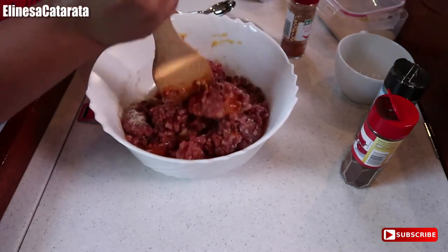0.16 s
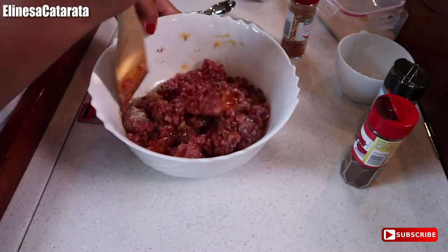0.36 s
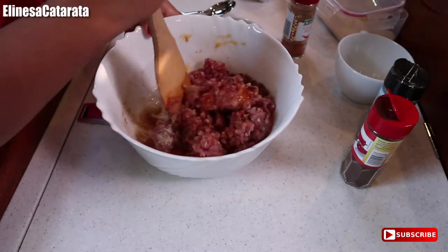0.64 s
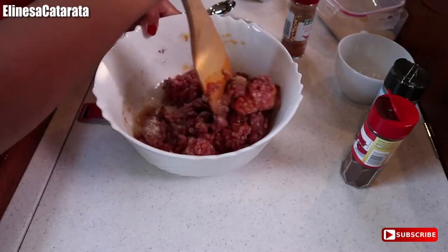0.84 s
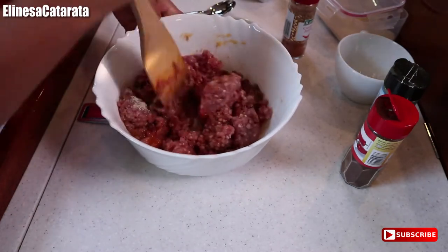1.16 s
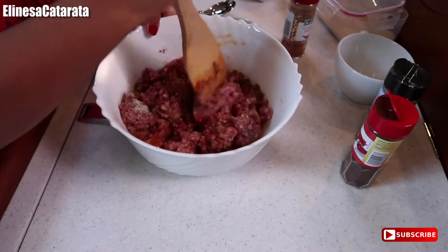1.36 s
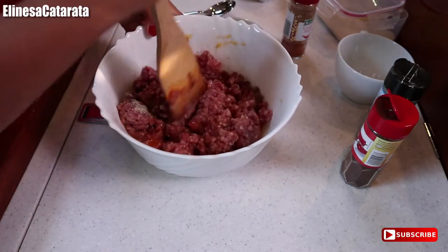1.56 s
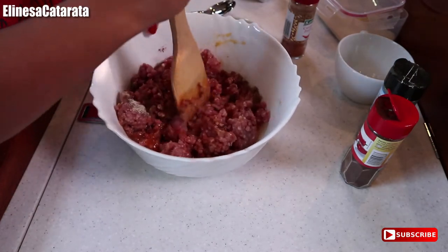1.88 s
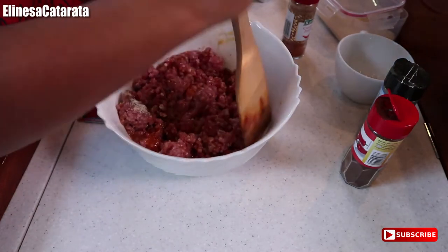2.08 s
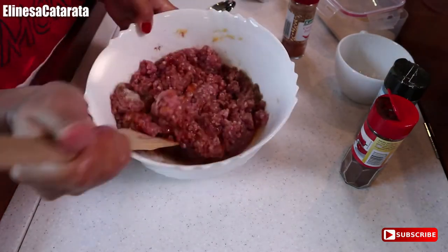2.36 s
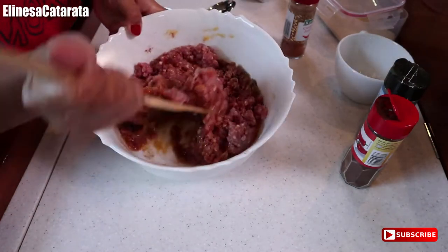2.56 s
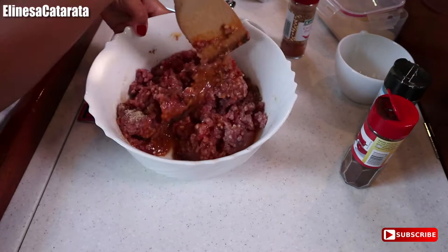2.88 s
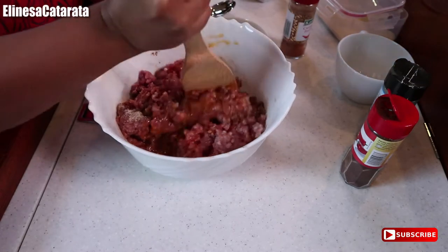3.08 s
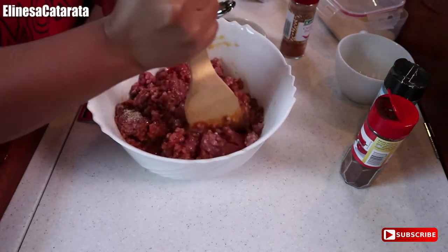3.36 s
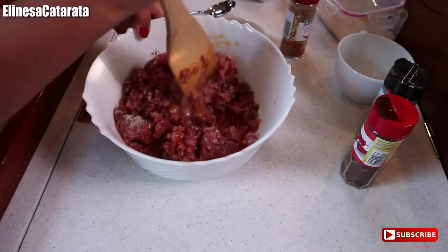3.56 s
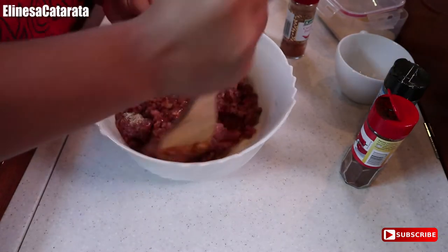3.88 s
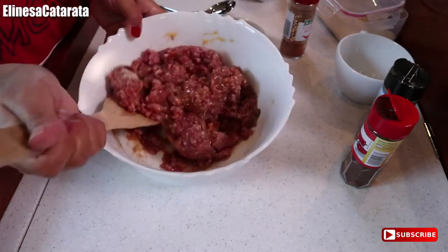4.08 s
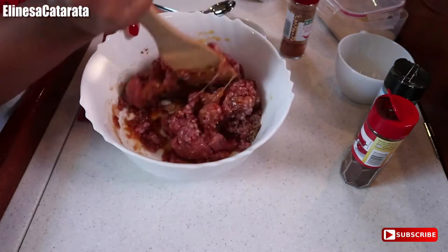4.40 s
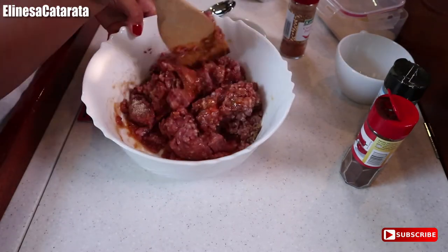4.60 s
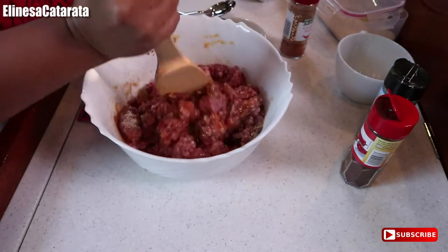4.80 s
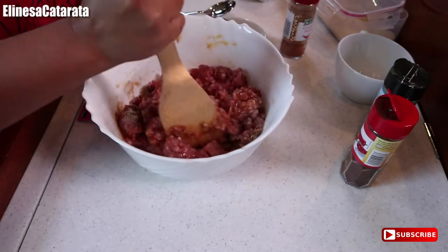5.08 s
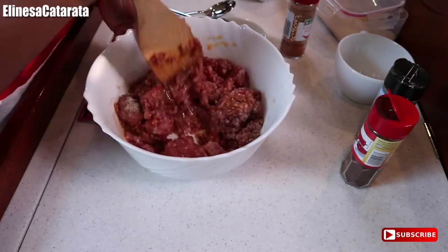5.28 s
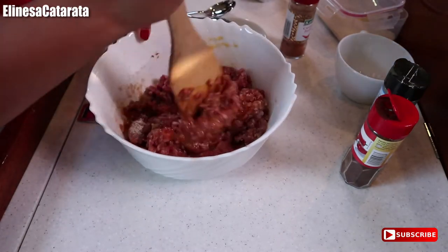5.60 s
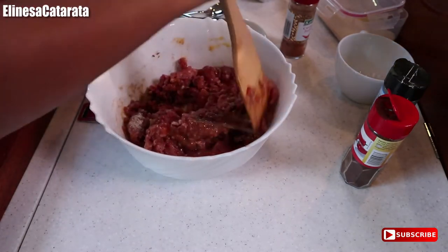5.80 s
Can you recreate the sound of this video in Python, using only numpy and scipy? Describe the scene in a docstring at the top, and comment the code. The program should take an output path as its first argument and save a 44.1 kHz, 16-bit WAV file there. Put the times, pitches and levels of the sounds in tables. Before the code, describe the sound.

Close, moist squelching and crackling of raw mince being mashed, as a wooden spoon clacks and scrapes the bowl in a small humming kitchen.

```python
"""Wet minced meat squelches and pops in a bowl on a kitchen table, as a wooden spoon stirs and mashes it.
The spoon clacks on the wall, scrapes and thumps the bowl: damped modes, stick-slip kicks and noise bursts.
The hardest blows jingle metal cutlery lying beside it; streams of tiny damped rings make the stirred meat.
Behind the bowl the table shudders and an appliance hums, with the small room's answer well below.
The camera's gain sinks a little after the hardest blows."""
import sys
import numpy as np
from scipy import signal
from scipy.fft import rfft, irfft, next_fast_len
from scipy.io import wavfile
from scipy.ndimage import map_coordinates

SR = 44100
rng = np.random.default_rng(int(sys.argv[2]) if len(sys.argv) > 2 else 0)


def put_to_file(sound):
    """Save the sound as 16-bit audio at rate SR, in the file named by the first command-line argument."""
    columns = np.atleast_2d(sound).T  # one column per channel
    safe = np.clip(columns, -1, 1)
    whole_steps = np.round(safe * 32767)
    wavfile.write(sys.argv[1], SR, whole_steps.astype(np.int16))


N = 261954  # length in samples


def amp(db):
    """Decibels to gain."""
    return 10 ** (np.asarray(db) / 20)


def unit(x):
    """Scale to rms 1."""
    return x / np.sqrt(np.mean(x ** 2) + 1e-20)


def burst(x, seconds):
    """Scale a short sound to the energy of that many seconds at rms 1."""
    return x * np.sqrt(seconds * SR / (np.sum(x ** 2) + 1e-20))


def fade(t, t60):
    """Exponential decay, down 60 dB after t60 seconds."""
    return np.exp(-np.log(1000) * t / t60)


def along(points, hz):
    """Interpolate (Hz, value) points on a log frequency axis."""
    f, v = np.transpose(points)
    return np.interp(np.log(hz + 1), np.log(f + 1), v)


def wobble(rate):
    """A smooth random curve, rate knots a second."""
    knots = rng.standard_normal(int(N * rate / SR) + 4)
    return map_coordinates(knots, [np.arange(N) * rate / SR])


def filtered(x, response):
    """x times a response of frequency."""
    size = next_fast_len(N + SR // 2)
    hz = np.fft.rfftfreq(size, 1 / SR)
    return irfft(rfft(x, size) * response(hz), size)[:N]


def coloured(x, spectrum):
    """x filtered by (Hz, dB) points, at rms 1."""
    return unit(filtered(x, lambda hz: amp(along(spectrum, hz))))


def band(x, lo, hi, order=2):
    """Causal band-pass."""
    edges = [lo, min(hi, SR / 2 - 1000)]
    return signal.sosfilt(signal.butter(order, edges, "band", fs=SR, output="sos"), x)


def add(track, s, sound):
    """Mix a sound into the track at time s."""
    part = track[max(round(s * SR), 0):][:len(sound)]
    part += sound[:len(part)]


# The rush of air in the kitchen. Each row: frequency in Hz, relative level in dB per Hz.
AIR = [(20, 1), (30, -4), (42, 6.5), (60, 0), (150, -1), (220, -4.5), (313, -5), (422, -3), (927, -5),
       (2210, -6.5), (3810, -15), (7300, -19), (14400, -21.5), (16500, -91)]
# The motor tones behind it. Each row: frequency in Hz, mean level in dB.
HUM = [(296, -58), (366, -64.5), (500.6, -70), (797, -65), (926, -66), (1400, -95)]


def appliance(air_db=-52):
    """A soft rush of air with a few motor tones, unsteady in level and phase."""
    t = np.arange(N) / SR
    out = amp(air_db) * coloured(rng.standard_normal(N), AIR)
    for hz, db in HUM:
        level = amp(db + 1.6 * wobble(3.72))
        out += level * unit(np.sin(2 * np.pi * hz * t + 0.5 * wobble(5.22)))
    return out


# How long the small room holds a sound. Each row: frequency in Hz, t60 in s.
KITCHEN = [(100, 0.42), (300, 0.21), (800, 0.16), (2000, 0.17), (5000, 0.16), (13000, 0.11)]


def kitchen(near, gap_s=.005, count=12):
    """The small room's answer: decaying noise, drawn afresh for each of count equal stretches of time."""
    out, edges = np.zeros(N), np.linspace(0, N, count + 1).astype(int)
    for a, b in zip(edges, edges[1:]):
        hz, t, cells = signal.stft(rng.standard_normal(SR // 3), SR, nperseg=256)
        # high notes die sooner than low ones
        cells = cells * fade(t, along(KITCHEN, hz)[:, None])
        tail = signal.istft(cells, SR, nperseg=256)[1]
        add(out, a / SR + gap_s, signal.fftconvolve(near[a:b], tail / np.linalg.norm(tail)))
    return out


# The arm leaning on the table. Each row: start in seconds, then the sway and the flex of the top,
# both as levels in dB before the table's own gain.
SWAY = [(0.499, -33, -60), (1.48, -41, -48.5), (1.808, -45, -46), (2.131, -44, -53), (2.379, -46, -37),
        (3.09, -45.5, -55), (3.41, -45, -49.5), (3.811, -33, -62), (3.901, -36, -60), (4.04, -50, -45.5),
        (4.774, -38.5, -37), (5.169, -39.5, -40), (5.512, -41, -39.5)]


def table(sway_hz=41, swell_s=0.067, gain_db=1, flex_hz=85, flex_t60=0.27):
    """Each push swells the table's lowest mode and flexes its top; both die away."""
    out, t = np.zeros(N), np.arange(SR // 2) / SR
    for s, sway_db, flex_db in SWAY:
        hz = sway_hz * (1 + 0.036 * rng.normal())
        swell = (t / swell_s * np.exp(1 - t / swell_s)) ** 2
        sway = swell * np.sin(2 * np.pi * hz * t)
        noise = rng.standard_normal(len(t)) * fade(t, flex_t60)
        flex = band(noise, flex_hz * 0.3, flex_hz * 1.94)
        push = amp(sway_db) * sway + amp(flex_db) * burst(flex, seconds=0.1)
        add(out, s, amp(gain_db) * push)
    return out


# Blows that jolt the cutlery beside the bowl. Each row: start in seconds, level in dB,
# approximate time from first to last hit in s.
JOLTS = [(.575, -17, 0.014), (3.904, -45, 0.0055), (4.784, -26.5, .013), (5.506, -29, 0.0095)]
# The cutlery's modes. Each row: frequency in Hz, mean level in dB, t60 in s.
STEEL = [(2450, -1, .08), (2590, -1, .08), (2848, 0, .09), (3348, -5, .08), (4620, -9, .12),
         (4925, -6, .13), (4992, 1, .15), (5062, -2, .14), (5810, -7, .14), (7339, -8, .12),
         (8032, -2.5, .16), (8371, -12, .14), (9012, -10, .17), (10400, -17, .1), (11210, -18, .14),
         (11810, -12, .14), (13600, -12, .12)]
BUZZ = .5  # rms depth of the buzz against the table; partials stay clear


def cutlery(count=4, scatter_db=1.5, buzz_hz=250, clatter_t60=0.0242):
    """Jolted metal spoons chatter a few times on the table and buzz against it as they ring on."""
    out, t = np.zeros(N), np.arange(SR // 3) / SR
    for s, db, length in JOLTS:
        hits = length * (np.arange(count) + rng.random(count) / 2) / (count - 1)
        ages = np.maximum(t - hits[:, None], 0)
        chatter = ((ages > 0) * fade(ages, clatter_t60)).sum(0)
        ring = unit(chatter * band(rng.standard_normal(len(t)), 1800, 3100, order=1))
        for hz, level, t60 in STEEL:
            shake = 1 + BUZZ * unit(band(rng.standard_normal(len(t)), buzz_hz / 10, buzz_hz))
            mode = (np.sin(2 * np.pi * hz * ages) * fade(ages, t60)).sum(0)
            ring += amp(level + scatter_db * rng.normal()) * unit(shake * mode)
        add(out, s, amp(db) * burst(ring, seconds=0.031))
    return out


def small_pops(rate=30, pitch_hz=4600, octaves=0.74, above_db=11, scatter_db=3, spread=0.73):
    """Lesser pockets burst at random within each stroke, as loud as its squelch allows; rows as in POPS."""
    rows = []
    for start, length, squelch_db, _, _ in STROKES:
        for k, (place, size, pitch) in enumerate(rng.standard_normal((16, 3))):
            age = (k + .5 + place / 2) / rate
            if age < length:
                db = squelch_db + above_db + scatter_db * size
                hz = min(pitch_hz * 2 ** (octaves * pitch), SR / 5)
                rows.append((start + age, db, hz, spread))
    return rows


# The larger air pockets bursting in the meat. Each row: start in seconds, level in dB,
# starting pitch in Hz, relative spread of the snap (it widens and strengthens the noise).
POPS = [(.0515, -27.5, 1940, 0.9), (0.068, -24, 2940, 0.55), (.089, -32, 2900, .7), (.153, -29, 3350, 0.63),
        (0.188, -30, 4450, 0.83), (1.0063, -25.5, 1750, 0.75), (1.0377, -28, 2170, 0.74),
        (1.113, -28, 6400, .7), (1.1332, -32, 1800, 0.52), (1.171, -27.5, 1900, 1.2),
        (1.2085, -28.5, 3100, 0.84), (1.435, -28, 2680, 1.15), (1.545, -30, 7600, .4),
        (1.564, -31, 3630, 1.8), (1.8032, -27.5, 5070, 1.2), (2.6988, -32.5, 8340, 0.37),
        (2.7723, -28, 8300, 0.75), (3.146, -19.5, 1900, 0.48), (3.167, -22.5, 2060, 0.47),
        (3.1878, -28.5, 2820, .6), (3.4577, -28.5, 2760, 0.47), (3.9049, -21.5, 1370, 0.8),
        (3.9606, -20, 3420, 0.45), (4.282, -23.5, 1480, 0.32), (4.3132, -28.5, 3090, 0.68),
        (4.72, -31, 2574, 0.74), (5.1019, -16, 9460, 0.63), (5.154, -23.5, 8340, 0.68),
        (5.1678, -25, 8860, 0.46), (5.224, -24, 3100, 0.55), (5.2814, -30, 5300, 0.66),
        (5.4315, -29, 2780, .6), (5.567, -14.5, 1940, 0.53)]


def pops(cycles=10, snap_t60=0.012, snap_db=2, reach=1.42, rise_s=0.000067):
    """A wet film snaps and the little cavity behind it rings for a few cycles, rising as it opens."""
    out, t = np.zeros(N), np.arange(SR // 40) / SR
    for s, db, hz, spread in POPS + small_pops():
        cavity = np.sin(2 * np.pi * hz * t * (1 + 12 * t)) * fade(t, cycles / hz)
        width = 2 ** (reach * spread)
        noise = rng.standard_normal(len(t)) * fade(t, snap_t60)
        snap = band(noise, hz / width, hz * width)
        pop = unit(cavity) + amp(snap_db) * spread ** 2 * unit(snap)
        pop = pop * (1 - np.exp(-t / rise_s))
        add(out, s, amp(db) * burst(pop, seconds=0.0007))
    return out


# The blade stuttering along the bowl. Each row: start in seconds, end in seconds, level in dB,
# resonance in Hz.
SCRAPES = [(0.043, 0.063, -42, 1300), (0.484, 0.506, -31, 262), (0.533, 0.576, -27, 265),
           (.955, 0.976, -42.5, 1370), (0.997, 1.157, -43.5, 1340), (1.849, 1.871, -36.5, 223),
           (3.089, 3.137, -30.5, 285), (3.44, 3.482, -47, 1340), (3.817, 3.852, -25, 266.4),
           (3.875, 3.913, -23.5, 255), (3.929, 3.953, -24.5, 254)]


def scrapes(rate=380, cycles=11, overtone=2.5, overtone_db=-6, grit_db=-13, grit_t60=0.0084, size_db=3.0):
    """Wood sticks and slips at an uneven rate; every slip kicks a resonance of the bowl or of the blade."""
    out, t = np.zeros(N), np.arange(SR // 20) / SR
    for start, end, db, hz in SCRAPES:
        size = int((end - start) * SR)
        # the slip rate takes a new value every 128 samples
        drift = np.repeat(rng.standard_normal(size // 128 + 1), 128)[:size]
        turns = np.cumsum(rate * np.exp(.6 * drift)) / SR
        slips = np.diff(np.floor(turns), prepend=-1)
        slips = slips * amp(size_db * rng.standard_normal(size)) * rng.choice([-1, 1], size)
        ring = unit(fade(t, cycles / hz) * np.sin(2 * np.pi * hz * t))
        upper = fade(t, cycles / hz / 5) * np.sin(2 * np.pi * overtone * hz * t)
        ring += amp(overtone_db) * unit(upper)
        # the contact itself adds a short gritty rasp
        grit = band(rng.standard_normal(len(t)) * fade(t, grit_t60), 760, 1470)
        ring += amp(grit_db) * unit(grit)
        kick = band(ring, hz * .78, hz * 10, order=3)
        stroke = signal.fftconvolve(slips * signal.windows.tukey(size, .3), kick)
        add(out, start, amp(db) * burst(stroke, seconds=end - start))
    return out


def grains(rate, pitch_hz, spread, cycles, size_db):
    """A steady stream of tiny damped rings of very unequal size."""
    count = int(rate * N / SR)
    place, size, life = rng.random((count, 3)).T
    hz = np.clip(pitch_hz * np.exp(spread * rng.standard_normal(count)), 100, 16000)[:, None]
    age = np.arange(256)  # samples
    turns = hz * age / SR
    gain = amp(-size_db * np.log(size + .02))[:, None]
    rings = gain * np.sin(2 * np.pi * turns) * np.exp(-turns / (cycles * (.5 + life[:, None])))
    spots = (place * N).astype(int)[:, None] + age
    return np.bincount(spots.ravel(), rings.ravel(), N)[:N]


# Strokes through the meat. Each row: start in seconds, length in seconds before the release, then levels
# in dB of the squelch, the sticky crackle and the drag on the bowl, before the trims in stirring().
STROKES = [(0, 0.18, -48, -50.5, -61), (0.442, 0.18, -46.5, -46.5, -44), (0.654, .15, -46.5, -45.5, -47),
           (0.99, 0.16, -49.5, -47, -55), (1.406, 0.12, -46, -46.5, -42.5), (1.795, 0.093, -48, -46, -46),
           (2.14, 0.25, -54.5, -54, -53), (2.38, 0.16, -52, -48, -54), (2.561, 0.096, -52.5, -47, -48),
           (3.021, 0.18, -47, -50, -44.5), (3.324, .28, -49.5, -49.5, -55), (3.801, 0.22, -50.5, -52, -52),
           (4.029, 0.18, -47.5, -50, -50), (4.253, 0.14, -49.5, -48.5, -50), (4.645, 0.26, -46, -44, -66),
           (5.142, 0.13, -45, -41, -51.5), (5.424, 0.2, -44.5, -42.5, -50), (5.89, .07, -49, -52, -46.5)]
ATTACK_S, RELEASE_S = 0.026, 0.067  # the blade enters the meat; the meat settles behind it
SETTLE_DB = -62.5  # floor of all three levels: the mince never quite stops ticking


def stroke_levels():
    """Squelch, crackle and drag: each stroke rises, holds and dies away."""
    t, levels = np.arange(N) / SR, np.zeros((3, N))
    for start, length, *db in STROKES:
        before, after = np.minimum(t - start, 0), np.maximum(t - start - length, 0)
        envelope = np.exp(before / ATTACK_S - after / RELEASE_S)
        levels = np.maximum(levels, amp(db)[:, None] * envelope)
    return np.hypot(levels, amp(SETTLE_DB))


# Filters on the grains of blade, wet meat and sticky strands. Each row: frequency in Hz, relative gain in dB.
DRAG = [(60, -10.5), (150, -9), (240, 1.5), (320, -4), (420, -11.5), (800, 0.5), (1200, -10), (2200, -22),
        (5000, -70)]
SQUELCH = [(500, -20.5), (1080, -0.5), (1400, 2), (1900, -2), (3200, 1.5), (5000, 5), (7000, -2.5),
           (12000, -33)]
CRACKLE = [(3000, 0), (5500, -8), (8300, 3), (10000, -9.5), (12700, 2), (16000, -1.5)]


def stirring(drag_db=-1, crackle_db=-1, clump_db=3.0):
    """The blade judders over the bowl while the mince squelches and its sticky strands tear."""
    squelch, crackle, drag = stroke_levels()
    lumps = amp(clump_db * wobble(50))  # the meat gives way lump by lump
    slips = grains(rate=400, pitch_hz=655, spread=0.53, cycles=0.45, size_db=-1.0)
    bubbles = grains(rate=1200, pitch_hz=2633, spread=0.568, cycles=4.6, size_db=4.0)
    strands = grains(rate=1200, pitch_hz=8980, spread=0.37, cycles=1.3, size_db=5.0)
    out = amp(drag_db) * drag * coloured(slips, DRAG)
    out += squelch * coloured(lumps * bubbles, SQUELCH)
    out += amp(crackle_db) * crackle * coloured(lumps * strands, CRACKLE)
    return out


# Spoon against bowl. Each row: start in seconds, note of the spot struck in Hz, strength in dB,
# hardness of the contact as a corner in Hz, weight on the bowl in dB.
KNOCKS = [(0.4245, 2773, -26, 4400, -27), (0.4826, 288, -39.5, 1900, 14.5), (.526, 1073, -28.5, 1650, 13.5),
          (0.5529, 1150, -38, 3240, 9), (.568, 480, -9.5, 1520, 0), (0.5828, 2740, -23.5, 4500, 6.5),
          (1.412, 715, -44.5, 2850, 10), (1.45, 2450, -39.5, 6760, 6), (1.488, 1295, -27, 5560, -2),
          (1.807, 280, -42.5, 3470, 13), (1.835, 902, -33.5, 1004, 8.5), (1.8463, 1630, -22, 1760, 5.5),
          (2.116, 1420, -19.5, 3340, -13.5), (2.356, 1370, -12, 1750, -37), (2.384, 3100, -21, 4900, -11.5),
          (2.393, 2860, -36, 2520, 12), (2.622, 655, -49.5, 1000, 6.5), (3.039, 688, -42.5, 2980, 13),
          (3.091, 860, -33, 1540, 0), (3.112, 1740, -29, 2080, 7.5), (3.128, 290, -34, 2480, 8.5),
          (3.4238, 258, -56, 3000, 21), (3.784, 907, -25, 2770, -3), (3.813, 288, -41, 1500, 18.5),
          (3.895, 250, -25, 1630, 13.5), (3.953, 463, -30.5, 1400, 3.5), (4.04, 690, -24.5, 700, -1.5),
          (4.743, 4550, -24, 4700, 0.5), (4.776, 1036, -6, 956, -7.5), (5.102, 1340, -35, 2200, -22),
          (5.176, 304, -31, 1525, 15.5), (5.192, 258, -40.5, 900, 14.5), (5.447, 280, -46.5, 2500, 14.5),
          (5.486, 3000, -18.5, 4160, -7), (5.499, 655, 3.5, 756, -19.5), (5.847, 1410, -28.5, 1330, -9.5),
          (5.869, 792, -23, 984, -10)]
# Registers of a knock: thud, wall, blade, crack, tick. Each row: low edge in Hz, high edge in Hz, t60 of the
# dense modes in s, their level against the clear modes in dB, register level in dB, share of the weight 0-1.
REGISTERS = [(162.5, 363, 0.17, -9.5, 0.5, 0.99), (376, 1040, 0.026, 0, 0.5, 0.43),
             (1195, 2510, 0.023, 1.5, -0.9, 0), (2560, 5420, 0.018, 6, 3, 0.04),
             (5300, 14500, 0.048, -4.5, 8.5, 0.07)]
# Clear modes of bowl, table and spoon. Each row: mean frequency in Hz, mean relative level in dB, t60 in s.
BOWL = [(177, -21, 0.34), (225.3, -10.5, 0.15), (253.7, -7.5, 0.076), (280.6, 3, 0.062), (295, -3, 0.048),
        (438, -1, 0.036), (527, -1, 0.023), (665, 2.5, 0.039), (805.5, -4, 0.087), (1135, 11.5, 0.036),
        (1307, 9, 0.02), (1600, 7.5, 0.022), (1800, -17.5, 0.014), (2960, -3.5, 0.033), (4796, -14, 0.017),
        (5660, -33, .015), (7200, 4.5, 0.0041), (8370, -6, 0.011), (12350, -7, 0.0089)]
CUSHION_ORDER = 5.22  # how steeply a blow's power falls above its corner


def knocks(scatter_db=2, detune=0.0385, rise_cycles=1.0, note_db=4, note_t60=0.022):
    """Wood on the wall rings the registers; meat cushions a blow above its corner, weight thumps the bowl."""
    out, t = np.zeros(N), np.arange(SR // 5) / SR
    for s, note_hz, db, corner_hz, weight_db in KNOCKS:
        # each point of contact picks the modes at new strengths, and the meat's load shifts them
        modes = [(hz * (1 + detune * rng.normal()), level + scatter_db * rng.normal(), life)
                 for hz, level, life in BOWL]
        attack = 1 - np.exp(-t * corner_hz / rise_cycles)
        for lo, hi, t60, dense_db, register_db, share in REGISTERS:
            clear = np.zeros(len(t))
            for hz, level, life in modes:
                if lo <= hz < hi:
                    clear += amp(level) * fade(t, life) * np.sin(2 * np.pi * hz * t)
            dense = rng.standard_normal(len(t)) * fade(t, t60)
            clear, dense = band([clear, dense], lo, hi)
            ring = unit(clear) + amp(dense_db) * unit(dense)
            # the note of the spot sounds only in the registers it falls in
            if lo / 1.1 <= note_hz < hi * 1.1:
                note = fade(t, note_t60) * np.sin(2 * np.pi * note_hz * t)
                ring += amp(note_db) * unit(note)
            centre_hz = np.sqrt(lo * hi)
            cushion = 1 / np.sqrt(1 + (centre_hz / corner_hz) ** CUSHION_ORDER)
            gain = cushion * amp(db + register_db + share * weight_db)
            add(out, s, gain * burst(ring * attack, seconds=0.0098))
    return out


def scene(room_db=-11):
    """Everything close at the bowl, its room, the shuddering table and the steady background."""
    near = cutlery() + pops() + scrapes() + stirring() + knocks()
    return (appliance() + amp(room_db) * kitchen(near) + table() + near)[None]


def gain_control(x, threshold_db=-26, lag_s=.12):
    """A slow gain control: the level sinks after the hardest blows and creeps back."""
    keep = np.exp(-1 / (lag_s * SR))
    power = (x / amp(threshold_db)) ** 2
    for _ in range(2):  # smoothed twice
        power = signal.lfilter([1 - keep], [1, -keep], power)
    return x / np.sqrt(1 + power)


TOP_HZ = 16200  # band limit


def record(dry):
    """The camera rides its gain, rounds off the highest peaks and keeps nothing above its band limit."""
    ridden = gain_control(dry[0])
    held = ridden / (1 + np.abs(ridden) ** 8) ** (1 / 8)
    return filtered(held, lambda hz: hz < TOP_HZ)[None]


dry = scene()
out = record(dry)
put_to_file(out)
```